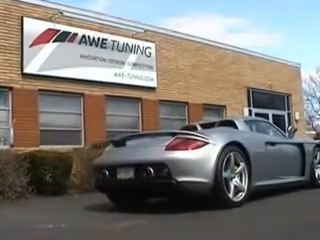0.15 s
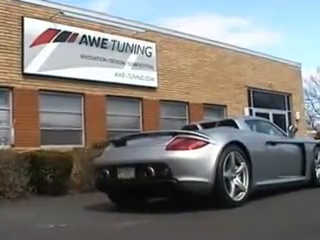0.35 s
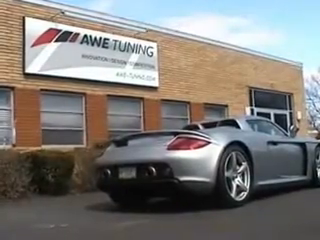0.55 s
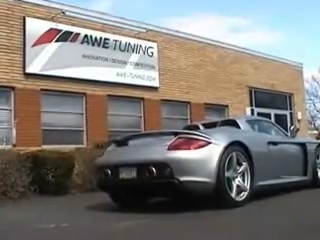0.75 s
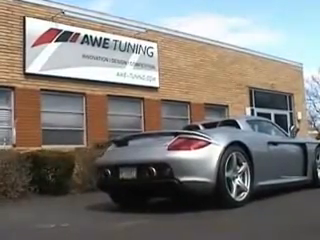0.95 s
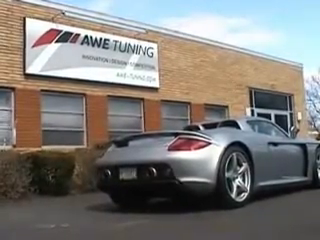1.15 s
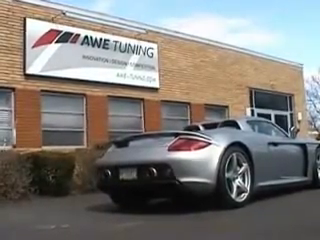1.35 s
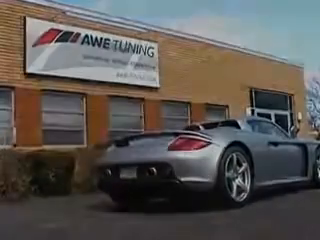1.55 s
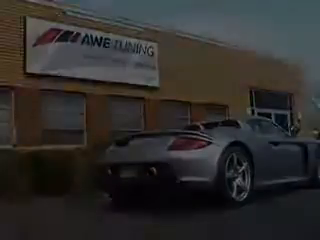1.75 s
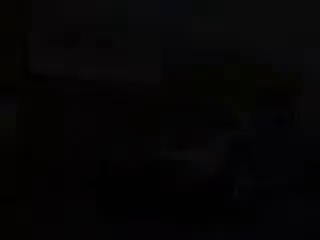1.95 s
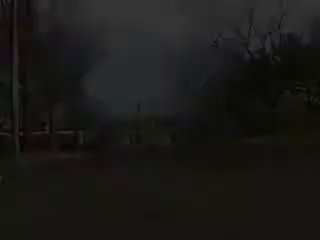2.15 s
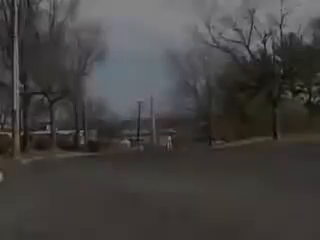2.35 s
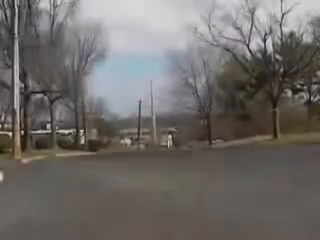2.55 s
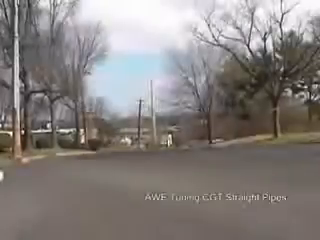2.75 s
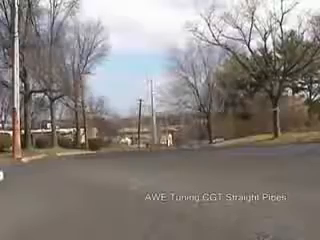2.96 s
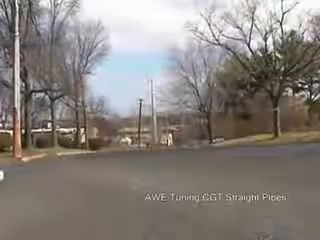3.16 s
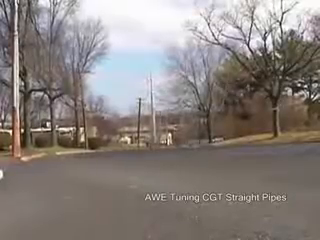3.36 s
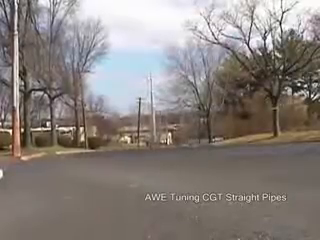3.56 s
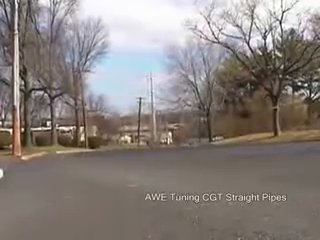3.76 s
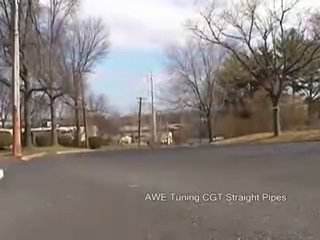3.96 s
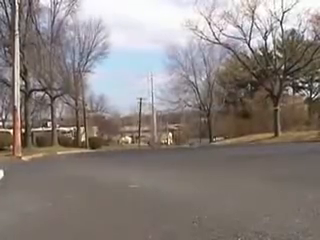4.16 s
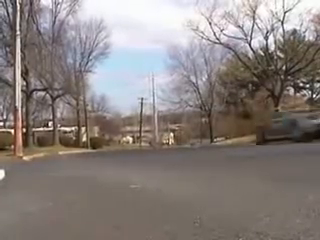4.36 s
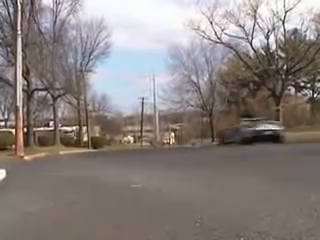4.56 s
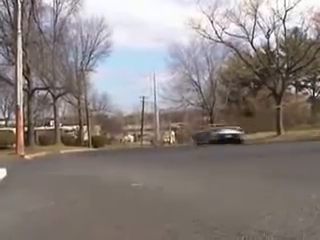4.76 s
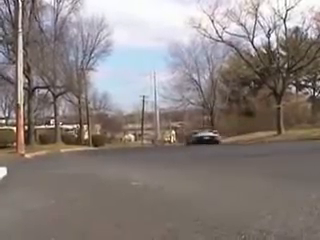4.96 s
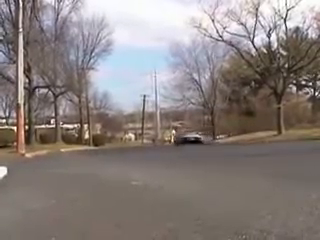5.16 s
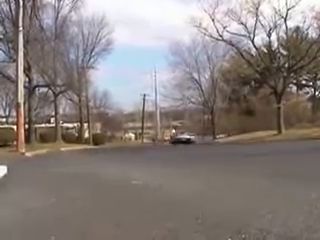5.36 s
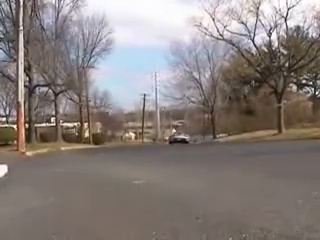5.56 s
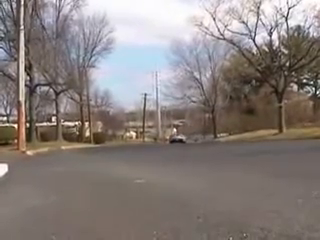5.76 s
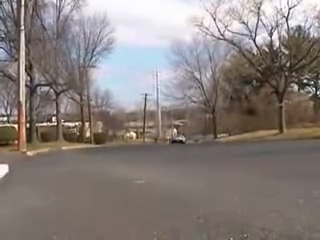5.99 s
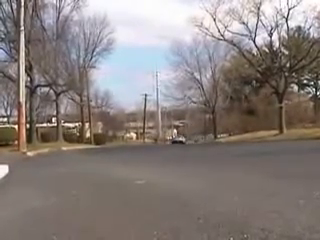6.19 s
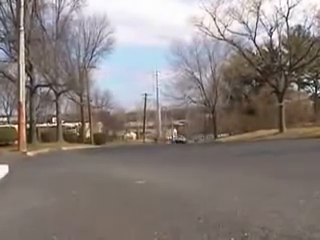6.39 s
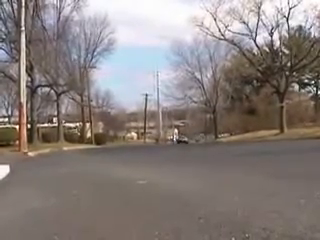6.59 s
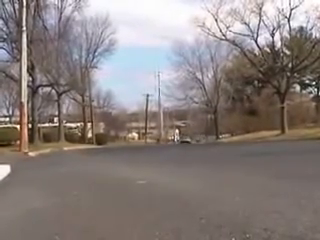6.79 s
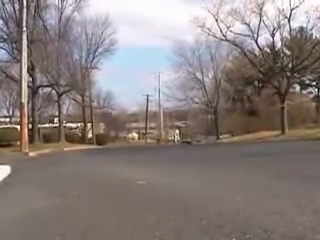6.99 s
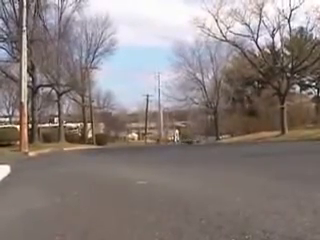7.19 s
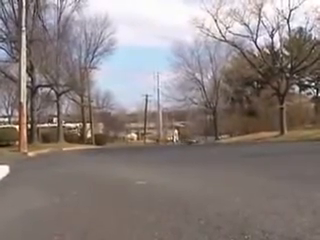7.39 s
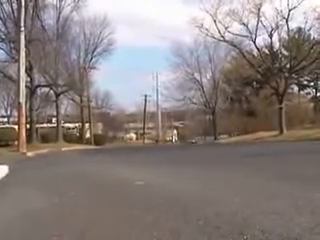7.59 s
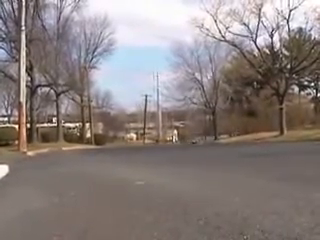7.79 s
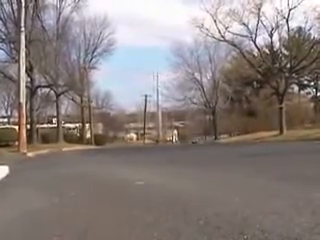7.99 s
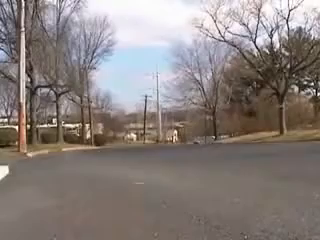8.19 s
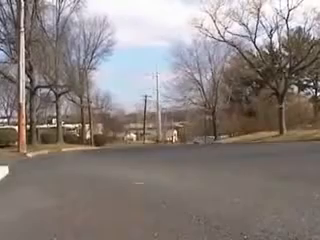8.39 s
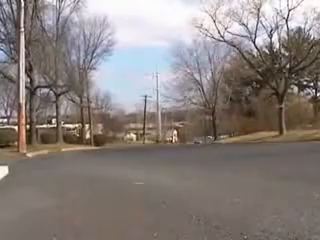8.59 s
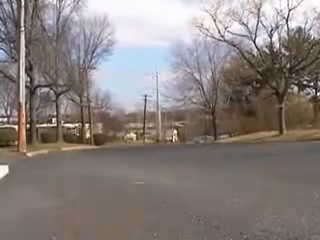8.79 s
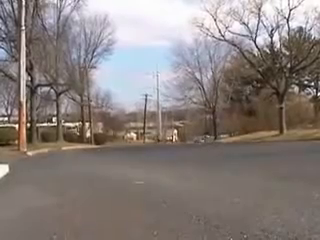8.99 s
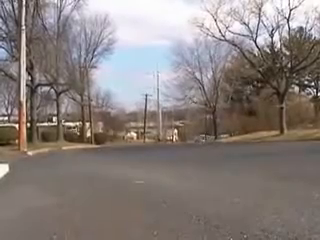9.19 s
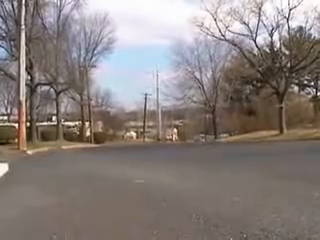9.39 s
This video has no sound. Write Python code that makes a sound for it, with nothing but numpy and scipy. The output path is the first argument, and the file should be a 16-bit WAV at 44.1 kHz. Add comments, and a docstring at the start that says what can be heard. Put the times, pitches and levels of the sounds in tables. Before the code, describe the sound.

Deep engine burble settles and fades to silence, then a howling full-throttle pass overloads the microphone, pops on a gear change and recedes.

```python
"""Beside a brick wall a ten-cylinder sports car with straight pipes drops from a blip to idle and fades out.
At a roadside, faded in next, it pulls past at full throttle, overloading the microphone, lifts off with
crackles for a gear change, pulls again far away, lifts again and cruises on.
Exhaust is summed from phase-locked orders, filtered firing pulses and noise puffs; pops are decaying modes
and noise cracks; tyres and rumble are coloured noise. Decaying-noise echoes and moving nulls place the car."""
import sys
import numpy as np
from scipy import signal
from scipy.fft import rfft, irfft
from scipy.io import wavfile
from scipy.ndimage import uniform_filter1d, map_coordinates

SR = 44100
rng = np.random.default_rng(int(sys.argv[2]) if len(sys.argv) > 2 else 0)


def to_wav(s):
    """Save 16-bit WAV."""
    ch = np.atleast_2d(s).T  # columns
    pcm = np.round(np.clip(ch, -1, 1) * 32767)  # PCM
    wavfile.write(sys.argv[1], SR, pcm.astype(np.int16))


N = 416304  # samples

# Source levels below are relative, ahead of echo and microphone. An order is a multiple of one bank's
# firing rate. A half-length is the time from a swell's peak to 1/e.

# Parked: falling firing rate of one bank: (time [s], rate [Hz])
COAST = [(0, 111.6), (.1, 92.25), (.17, 80), (.25, 71.2), (.33, 61.16), (.5, 50.2), (.58, 44.4), (.7, 42.6),
         (.82, 38.84), (1.15, 35.7), (2.05, 36.65)]
# Resonances of the parked car's pipe: (frequency [Hz], gain [dB])
IDLE_PIPE = [(30, -20), (70, -3.5), (110, -4.5), (150, 11.5), (210, -4), (280, -4), (380, -12.5),
             (520, -10.5), (620, -12), (720, -28.5), (950, -22.5), (1200, -39.5), (1900, -50),
             (2900, -47.5), (4500, -58.5)]
# Spectrum of the idle clatter: (frequency [Hz], gain [dB])
CLATTER_SPECTRUM = [(500, 5), (900, 7), (1400, -1), (2000, -3.5), (2500, -9.5), (3100, -9.5), (3700, -11),
                    (5500, -11), (7400, -9.5), (10000, -25)]
# Spectrum of the idle rasp: (frequency [Hz], gain [dB])
IDLE_RASP = [(1200, -22), (2400, 2), (3300, -1.5), (4200, -12.5), (8000, -22)]
# Spectrum of low rumble, parked and on the road: (frequency [Hz], gain [dB])
RUMBLE_SPECTRUM = [(15, -3.5), (40, -0.5), (90, -2), (170, -2), (300, -3.5), (700, -31.5), (2000, -67.5)]
# Parked layers, by name: (level at idle [dB], rise with revs [dB/octave], highest level [dB])
IDLE_LAYERS = {"exhaust": (-46, 9.3, -34), "clatter": (-64, 9.1, -50), "rasp": (-76, 13.4, -51),
               "rumble": (-53, 7.6, -40)}
# Boom as the falling rate sweeps the pipes: (order, level [dB])
BLIP_BOOM = [(1, -14), (2, 0), (3, -5), (5, -12)]
# Unburnt fuel pops in the pipes: (time [s], crack level [dB], thump relative to crack [dB])
POPS = [(0.216, -50, 19), (0.267, -45, 14.5), (0.3313, -53.5, 20.5), (7.238, -34.5, 18.5),
        (7.2558, -23, 12), (7.2718, -18, 1), (7.3158, -23, -2), (7.3336, -23.5, -2.5), (7.377, -33.5, 7),
        (7.476, -37.5, 13), (8.526, -41, 10.5), (8.5674, -40, 14), (8.594, -35.5, 15.5),
        (8.6051, -32.5, 12.5)]
# Ringing modes of a pop, before random detuning: (frequency [Hz], level [dB], decay by 60 dB [s])
POP_MODES = [(300, 3, 0.061), (350, 9, 0.052), (560, -9, 0.016)]
# Spectrum of the gargle in the pipes: (frequency [Hz], gain [dB])
BURBLE_SPECTRUM = [(250, -32), (460, 10), (600, 0), (800, -21), (3000, -48)]
# Spectrum of the background hiss: (frequency [Hz], gain [dB])
FLOOR_SPECTRUM = [(100, 6.5), (600, 0.5), (2000, -10), (8000, -16), (10000, -21.5)]

# On the road: firing rate of one bank, before driveline swings: (time [s], rate [Hz])
SPEED = [(2.1, 148.1), (2.95, 175.4), (3.35, 196.3), (3.53, 199.8), (3.7, 206.4), (3.87, 209.3),
         (4.27, 206.9), (4.75, 214.5), (5.3, 227.9), (5.9, 250.2), (7.24, 319.2), (7.5, 227.6),
         (7.72, 168.5), (7.76, 209), (7.795, 258.8), (7.845, 244.8), (7.92, 233.5), (8.3, 239.1),
         (8.65, 238.8), (9.44, 224.4)]
# Jolts that set the driveline swinging: (time [s], swing of the firing rate [Hz])
JOLTS = [(5.489, 5), (7.905, -12.5), (8.351, -10.5)]
# Throttle openings: (open from [s], open until [s], load [0-1], closing time [s])
THROTTLE = [(2.0, 3.26, .45, .035), (3.26, 7.228, 1, .03), (7.31, 7.5, .33, .22), (7.75, 8.42, 1, .06),
            (8.622, 9.5, .63, .05)]
# Exhaust reaching the roadside; it leaps as the pipes come into view: (time [s], exposure [dB])
EXPOSURE = [(2.2, -29), (2.8, -22.5), (3.1, -22.5), (3.32, -23), (3.84, -21), (3.91, -10), (4.03, -7),
            (4.42, -1), (4.9, -9), (5.3, -14), (5.85, -16.5), (6.55, -14), (7.2, -19), (7.7, -21.5),
            (8.42, -17.5), (8.8, -25.5), (9.44, -28)]
# Road layers, by name: (level [dB], share of exposure, rise with revs [dB/octave],
# drop off the throttle [dB], loss behind the car's body, negative for a gain [dB])
ROAD_LAYERS = {"boom": (-17, 0.2954, 3, 1, -3.5), "howl": (-17.1, .05, 0, 19, 8),
               "third": (-16, 1.14, -1.5, 8.5, 6.5), "fourth": (-13.5, 1.78, 1.5, 16, -4),
               "lope": (-29, 0.44, 10, -5, -1), "blare": (-18.5, 1, 7.5, 6, 3.5),
               "rasp": (-24, 1.4354, 21.5, 1.5, -0.5)}
# Low road and air rumble: (time [s], level [dB])
RUMBLE_LEVEL = [(2.5, -47), (4.1, -32), (5.24, -36.5), (6.11, -34.5), (9.44, -45)]
# Tyre and intake hiss: (time [s], level [dB])
HISS_LEVEL = [(2.2, -67.5), (2.8, -57), (3.1, -68), (3.32, -53.5), (3.8, -55), (4.2, -39), (4.6, -42.5),
              (5.2, -76.5), (9.44, -82.5)]
# Spectrum of that hiss: (frequency [Hz], gain [dB])
TYRE_SPECTRUM = [(2000, -21), (5000, -4.5), (6500, -2), (7700, -1.5), (9000, -7), (10300, -21.5)]
# Pipe resonances met by passing orders: (frequency [Hz], gain [dB])
PIPE = [(150, -8), (177, -3), (207, -1.5), (228, -6), (255, -13), (295, -15), (320, -10), (350, -20),
        (395, -13), (418, -9), (445, -5.5), (466, -1), (560, 1), (650, 1), (695, 3), (730, 1), (780, -13),
        (850, -12), (905, -17), (950, -6), (1040, -12), (1120, -18), (1300, -25)]
# Brief dips of the boom as the car gathers way: (time [s], depth [dB])
DIPS = [(2.38, 18), (2.63, 7), (2.79, 23), (2.935, 9), (3.125, 10), (3.285, 10)]
# Momentary flares of low orders, negative when sinking: (time [s], half-length [s], order, rise [dB])
FLARES = [(2.2, .2, 1, -4), (2.42, .25, 3, 8), (4.15, .35, 2, 3), (6.05, .25, 4, 7), (6.95, .25, 1, 4),
          (7.68, .14, 1, -13), (7.79, .04, 4, 17), (8.15, .3, 2, 2), (8.22, .3, 4, 17), (9.2, .4, 1, 2),
          (9.25, .4, 2, 3.5)]
# Spectrum of the brassy firing pulses: (frequency [Hz], gain [dB])
BLARE_SPECTRUM = [(550, -44.5), (720, 0.5), (850, 5), (1080, 5.5), (1270, 3), (1480, -2), (1700, -2.5),
                  (2100, -3), (2600, -17), (4000, -30.5), (8000, -63)]
# Spectrum of the gas noise beneath them: (frequency [Hz], gain [dB])
ROAR_SPECTRUM = [(200, -13), (500, 0.5), (850, -1), (1300, -2.5), (1800, -4.5), (2300, -13), (3200, -18.5),
                 (6000, -57.5)]
# Spectrum of the rasp: (frequency [Hz], gain [dB])
RASP_SPECTRUM = [(1400, -32.5), (2100, 6.5), (2700, 2.5), (3700, 1), (5000, -4.5), (7200, -12), (8500, -17),
                 (10000, -26)]
# Colour from far down the road: (frequency [Hz], gain [dB])
AIR = [(900, 1.5), (1180, -1.5), (1750, -3), (3500, -5.5), (5000, -8.5), (8000, -14)]
# Spectrum of unequal cylinders and gas noise: (frequency [Hz], gain [dB])
LOPE_SPECTRUM = [(60, -20.5), (170, -11), (270, 1), (330, -0.5), (420, 0), (540, -3), (700, -3.5),
                 (900, -10), (1600, -23.5), (3000, -67)]
# Short exhaust barks around throttle changes: (time [s], half-length [s], level [dB])
BARKS = [(3.167, .025, -40), (3.287, 0.024, -34.5), (7.794, 0.037, -42), (8.414, .03, -42.5)]
# Spectrum of a bark: (frequency [Hz], gain [dB])
BARK_SPECTRUM = [(350, -22), (650, 6), (1050, 5), (1400, -6), (2000, -14), (3500, -25), (9000, -54)]
# Growl under load: (order, level [dB])
GROWL_ORDERS = [(4, -1), (5, -5), (6, -1), (7, -5.5), (8, -5.5), (9, -7.5), (10, -13)]
# Its swells after the throttle opens: (time [s], half-length [s], level [dB])
GROWLS = [(3.48, .22, -49), (7.8, .04, -44)]
# Reflection off the verge: (time [s], delay [ms], strength [ratio])
VERGE = [(4.15, .3, 0), (4.33, .4, .6), (4.46, .51, .7), (4.6, .6, .55), (4.8, .73, .3), (5.0, .85, 0)]
# High orders sing out far behind the car: (order, level [dB])
SONG_ORDERS = [(3.2, -9), (5, -6), (5.2, -6), (6, 1.5), (7, -14), (8, -5), (9, -16), (11, -20)]
# Pipes drone during the gear change: (order, level [dB])
OVERRUN_ORDERS = [(1, -10), (1.6, -4), (2, 0), (2.6, -14)]

IDLE_HZ, MID_REVS_HZ = 36.4, 230  # reference firing rates of one bank
IDLE_ROUGH, IDLE_ODD_DB = .5, -9  # share of rough gas; change of odd orders at idle
BLIP_BOOM_S, BLIP_BOOM_HALF_S, BLIP_BOOM_DB = .1, .12, -35
FLOOR_DB = -77.5
CUT_S, GAP_S, FADE_FLOOR = 2.11, 0.031, 0.14  # change of place; ramp to silence on each side; least fade gain
FADE_OUT_S, FADE_IN_S, FADE_OUT_SHAPE, FADE_IN_SHAPE = 0.86, 0.78, 0.6, 1  # lengths and exponents
OPEN_S = 0.022  # throttle opening time
SHUDDER_HZ, SHUDDER_S = 7.39, 0.18  # rate and 1/e decay time of the driveline swing
SCREEN_S, SCREEN_HALF_S = 3.33, 0.44  # the approaching car's body stands between pipes and microphone
PASS_S, APPROACH_S, RECEDE_S = 4.37, 18, 5.3  # the pass; time to full remoteness ahead and behind
# share of the blare that is clean pulses: value at 0 dB exposure, change per dB, loss far away
CLEAN_NEAR, CLEAN_PER_DB, CLEAN_FAR_LOSS = .89, .018, .8
DIP_HALF_S = 0.015
BOOM_FAR_LOSS_DB, BOOM_FLUTTER = 10.5, 2.4  # far away the boom is weaker and flutters
BUMP_S, BUMP_HZ, BUMP_HALF_S, BUMP_DB = 3.195, 54.8, 0.0092, -27.5
# a reflection cancels a band that sinks as the car passes; width in natural-log frequency
NULL_HZ, NULL_SINK_S, NULL_WIDTH, NULL_DB = 645, 0.67, 0.13, 17
HOLLOW_HZ, HOLLOW_SINK_S, HOLLOW_DB = 1646, 0.54, 7.5  # a higher null
NEAR_HALF_S, NEAR_ECHO_LOSS, NEAR_DIRECT_GAIN = 0.41, 0.6, 0.32  # direct sound outweighs echo at the pass
SONG_S, SONG_HALF_S, SONG_DB = 6.48, .7, -40
OVERRUN_S, OVERRUN_HALF_S, OVERRUN_DB = 7.45, .24, -31
TOP_HZ = 10300  # band limit


def amp(db):
    """The decibel relation: amplitude ratio of a level."""
    return 10 ** (np.asarray(db) / 20)


def unit(x):
    """Normalisation of mean power: x at rms 1."""
    return x / np.sqrt(np.mean(x ** 2) + 1e-20)


def steady(x):
    """Short-time power normalisation: x held at rms 1 over a moving 91 ms window."""
    power = np.abs(uniform_filter1d(x ** 2, size=4000))
    return x / np.sqrt(power + 1e-12)


def curves(rows):
    """Linear interpolation: one value per sample for each column after the time."""
    s, *cols = np.transpose(rows)
    return [np.interp(np.arange(N) / SR, s, c) for c in cols]


def wobble(rate):
    """Band-limited fluctuation: a smooth random curve with rate knots a second."""
    knots = rng.standard_normal(int(N * rate / SR) + 4)
    coarse = np.arange(0, N, 32)
    return np.interp(np.arange(N), coarse, map_coordinates(knots, [coarse * rate / SR]))


def swell(at_s, half_s):
    """Gaussian envelope: a bell-shaped rise and fall, 0-1."""
    return np.exp(-((np.arange(N) / SR - at_s) / half_s) ** 2)


def colour(x, points):
    """Minimum-phase filtering: a causal response with the gain of (frequency [Hz], gain [dB]) points."""
    m = 8192
    hz, db = np.transpose(points)
    gain = amp(np.interp(np.log(np.fft.rfftfreq(m, 1 / SR) + 1), np.log(hz), db))
    # folding the cepstrum onto positive time makes the response causal
    cepstrum = irfft(np.log(gain), m)
    cepstrum[1:m // 2] *= 2
    cepstrum[m // 2 + 1:] = 0
    response = irfft(np.exp(rfft(cepstrum)), m)[:m // 2]
    return signal.oaconvolve(x, response)[:N]


def noise(points):
    """Spectral shaping of white noise: coloured noise of rms 1."""
    return unit(colour(rng.standard_normal(N), points))


def orders(turns, rows, flutter_db, rate):
    """Harmonic synthesis: lines at multiples of the firing rate, each wavering in level on its own."""
    lines = [amp(db + flutter_db * wobble(rate)) * np.cos(2 * np.pi * order * turns + order ** 2)
             for order, db in rows]
    return np.sqrt(2) * sum(lines)


def firings(turns, pattern, scatter):
    """Periodic excitation: a pulse each whole turn, sized by a repeating cylinder pattern and by chance."""
    count = np.arange(1, int(turns[-1]))
    at = np.interp(count, turns, np.arange(N))
    size = np.asarray(pattern)[count % len(pattern)] + scatter * rng.standard_normal(len(count))
    # a windowed sinc places each pulse between samples
    taps = at.astype(int)[:, None] + np.arange(-7, 9)
    lag = taps - at[:, None]
    shape = np.sinc(lag) * np.cos(np.pi * lag / 16) ** 2
    return np.bincount(np.clip(taps, 0, N - 1).ravel(), (size[:, None] * shape).ravel(), N)


def puffs(turns, depth):
    """Amplitude modulation: white noise swells once a turn, as gas leaves the pipe."""
    return rng.standard_normal(N) * np.exp(depth * np.cos(2 * np.pi * turns))


def ring(x, delay_ms, share):
    """All-pass recirculation: pulses bounce in the pipe, spread in time with their colour unchanged."""
    loop = np.r_[1, np.zeros(int(delay_ms * SR / 1000)), np.clip(share, 0, .8)]
    return signal.lfilter(loop[::-1], loop, x)


def idle_exhaust(bank_turns, bank_hz, octaves):
    """Resonant emphasis: orders slide through the pipe's resonances, roughened by unequal firings and gas."""
    pipe_hz, pipe_db = np.transpose(IDLE_PIPE)
    # the odd orders fade as the banks even out at idle
    odd_db = IDLE_ODD_DB * np.clip(1 - octaves, 0, 1)
    stack = [(k, np.interp(k * bank_hz, pipe_hz, pipe_db) + k % 2 * odd_db) for k in range(1, 18)]
    turns = 2 * bank_turns
    uneven = firings(turns, [.5, -.1, .2, .1, -.3, -.1, -.3, .2, .3, -.3], scatter=0.25)
    gas = unit(ring(uneven, delay_ms=5.9, share=.5)) + unit(puffs(turns, depth=0.29))
    clear = steady(orders(bank_turns, stack, flutter_db=1.5, rate=13.5))
    return clear + IDLE_ROUGH * steady(colour(gas, IDLE_PIPE))


def blip_boom(bank_turns):
    """Passage through resonance: low orders boom briefly as the falling rate sweeps the pipes."""
    envelope = amp(BLIP_BOOM_DB) * swell(BLIP_BOOM_S, BLIP_BOOM_HALF_S)
    return envelope * orders(bank_turns, BLIP_BOOM, flutter_db=3, rate=18)


def parked():
    """Source superposition: both banks fire in turn, with boom and rasp while the revs are high."""
    bank_hz, = curves(COAST)
    octaves = np.log2(bank_hz / IDLE_HZ)
    gain = {name: amp(np.minimum(db + rise * octaves, top_db))
            for name, (db, rise, top_db) in IDLE_LAYERS.items()}
    bank_turns = np.cumsum(bank_hz * (1 + .008 * wobble(14))) / SR
    turns = 2 * bank_turns
    layers = {"exhaust": idle_exhaust(bank_turns, bank_hz, octaves),
              "clatter": unit(colour(puffs(turns, depth=0.22), CLATTER_SPECTRUM)),
              "rasp": unit(colour(puffs(turns, depth=0.4), IDLE_RASP)),
              "rumble": noise(RUMBLE_SPECTRUM)}
    gargle = burble(turns, at_s=0.23, half_s=0.057, level_db=-36.5)
    return sum(gain[name] * layers[name] for name in layers) + blip_boom(bank_turns) + gargle


def echo(x, t60):
    """Diffuse reverberation: convolution with decaying noise of unit energy."""
    t = np.arange(SR // 2) / SR
    tail = rng.standard_normal(len(t)) * amp(-60 * t / t60)
    return signal.fftconvolve(x, tail / np.linalg.norm(tail))[:N]


def surroundings(x, t60, wet_db, near=0):
    """Direct-to-reverberant ratio: a short scattered echo counts for less while the car is near."""
    scattered = colour(echo(x * (1 - NEAR_ECHO_LOSS * near), t60),
                       [(60, -9.5), (200, 0), (600, 3.0), (1200, 4), (3000, 3), (9000, -0.5)])
    return x * (1 + NEAR_DIRECT_GAIN * near) + amp(wet_db) * scattered


def background_hiss():
    """Stationary noise: a steady faint hiss."""
    return amp(FLOOR_DB) * noise(FLOOR_SPECTRUM)


def backfires():
    """Impulsive excitation: each pop is a sharp noise crack and a short modal ring of the pipe."""
    t = np.arange(SR // 10) / SR
    cracks, thumps = np.zeros(N), np.zeros(N)
    for s, db, thump_db in POPS:
        start = round(s * SR)
        thump = sum(amp(level - 60 * t / t60) * np.sin(2 * np.pi * hz * rng.uniform(1.0, 1.1) * t)
                    for hz, level, t60 in POP_MODES)
        thumps[start:start + len(t)] += amp(db + thump_db - 8.5) * thump
        cracks[start:start + len(t)] += amp(db - 60 * t / 0.028) * rng.standard_normal(len(t))
    return thumps + colour(cracks, [(300, -2.5), (1500, 8.5), (4000, -3.0), (10000, -29.0)])


def burble(turns, at_s, half_s, level_db):
    """Modulated combustion noise: late-burning fuel gargles briefly in the pipes."""
    return amp(level_db) * swell(at_s, half_s) * unit(colour(puffs(turns, depth=0.72), BURBLE_SPECTRUM))


def fade(away_s, length_s, shape):
    """Power-law fading: gain grows with the time away from the change of place."""
    gap = np.clip(away_s / GAP_S, 0, 1)
    return gap * np.maximum(np.clip(away_s / length_s, 0, 1) ** shape, FADE_FLOOR)


def throttle(t):
    """Piecewise-linear control: engine load 0-1 as the throttle opens, holds and closes."""
    total = 0
    for on, off, load, close_s in THROTTLE:
        opening = (t - on) / OPEN_S
        closing = 1 - (t - off) / close_s
        total = total + load * np.clip(np.minimum(opening, closing), 0, 1)
    return np.clip(total, 0, 1)


def shudder(t):
    """Damped oscillation: after each jolt the revs swing about their course and settle."""
    total = 0
    for s, swing in JOLTS:
        since = np.maximum(t - s, 0)
        total = total + swing * np.exp(-since / SHUDDER_S) * np.sin(2 * np.pi * SHUDDER_HZ * since)
    return total


def null(hz, t, null_hz, sink_s):
    """Destructive interference: depth 0-1 of a cancelled band that sinks as the car passes."""
    since = t - PASS_S
    off_null = np.log(hz / null_hz) + since / sink_s
    return np.exp(-(off_null / NULL_WIDTH) ** 2 - (since / sink_s) ** 2)


def tone_db(hz):
    """Transfer function: pipe gain at an order's momentary frequency, less the sinking null."""
    pipe_hz, pipe_db = np.transpose(PIPE)
    resonance_db = np.interp(np.log(hz), np.log(pipe_hz), pipe_db)
    return resonance_db - NULL_DB * null(hz, np.arange(N) / SR, NULL_HZ, NULL_SINK_S)


def low_order(order, db, turns, bank_hz):
    """Harmonic radiation: one order with fixed phase, pipe gain, flares and a random waver."""
    flare_db = sum(rise * swell(s, half_s) for s, half_s, k, rise in FLARES if k == order)
    level_db = db + flare_db + tone_db(order * bank_hz) + 0.93 * wobble(22)
    return np.sqrt(2) * amp(level_db) * np.cos(2 * np.pi * order * turns + 1.347 * order ** 2)


def low_orders(turns, bank_hz, level, load, far):
    """Harmonic superposition: boom of one bank, howl of both, and the third and fourth orders."""
    dips_db = sum(db * swell(s, DIP_HALF_S) for s, db in DIPS)
    boom_db = level["boom"] - dips_db - BOOM_FAR_LOSS_DB * far
    flutter = np.clip(BOOM_FLUTTER * far, 0, .9) * np.tanh(wobble(28))
    levels = [boom_db, level["howl"], level["third"], level["fourth"]]
    boom, howl, third, fourth = [low_order(order, db, turns, bank_hz) for order, db in enumerate(levels, 1)]
    # off the throttle the cylinders burn unevenly: the howl throbs over each five-cylinder cycle
    cycle = 2 * np.pi * turns / 5
    depth = np.minimum(.12 + 1.2 * (1 - load), .8)
    throb = depth * (.5 * np.cos(cycle) + .4 * np.sin(2 * cycle))
    return boom * (1 + flutter) + howl * (1 + throb) + third + fourth


def upper_orders(turns, blare_db, rasp_db, clean, far):
    """Broadband pulse excitation: sharp firings and puffs of gas make the brassy blare and the rasp."""
    near_bank = firings(turns, [1, 1.08, .9, 1.05, .95], scatter=.08)
    # the second bank fires halfway between; far away both are heard and even orders lead
    pulses = near_bank + 0.76 * far * firings(turns + .5, [1], scatter=0.083)
    brass = steady(colour(ring(pulses, delay_ms=1.302, share=0.5), BLARE_SPECTRUM))
    blare = np.sqrt(clean) * brass * amp(1.5 + 1.8 * wobble(19) + 1.4 * wobble(90))
    roar = np.sqrt(1 - clean) * unit(colour(puffs(turns, depth=0.16), ROAR_SPECTRUM)) * amp(1.0)
    # close by, each firing stands out as a separate snap; distance smears them into hiss
    crisp = .8 * clean ** 2
    snaps = steady(colour(ring(pulses, delay_ms=.45, share=0.12), RASP_SPECTRUM))
    gas = steady(colour(puffs(turns, depth=.2 + .7 * crisp), RASP_SPECTRUM))
    rasp = np.sqrt(crisp) * snaps + np.sqrt(1 - crisp) * gas
    bright = amp(blare_db) * (blare + roar) + amp(rasp_db + 1.56 + 3.9 * far) * rasp
    return (1 - far) * bright + far * colour(bright, AIR)


def uneven_lope(turns):
    """Subharmonic sidelines: five unequal cylinders give lines at fifths of the firing rate, over gas noise."""
    uneven = firings(turns, [0.85, 0.27, -0.053, -0.48, 0.09], scatter=0.5)
    sidelines = steady(colour(uneven, LOPE_SPECTRUM))
    return .7 * (sidelines + noise(LOPE_SPECTRUM)) * (1 - .5 * swell(PASS_S, .6))


def road_rumble():
    """Low-frequency turbulence: rumble of road and air."""
    return amp(curves(RUMBLE_LEVEL)[0]) * noise(RUMBLE_SPECTRUM)


def driving():
    """Source and path: exposure, revs and load set the exhaust layers, tied to the shaft."""
    t = np.arange(N) / SR
    bank_hz = curves(SPEED)[0] + shudder(t)
    exposure_db, = curves(EXPOSURE)
    load, octaves = throttle(t), np.log2(bank_hz / MID_REVS_HZ)
    screened = swell(SCREEN_S, SCREEN_HALF_S)
    level = {name: db + share * exposure_db + rise * octaves - drop * (1 - load) - loss * screened
             for name, (db, share, rise, drop, loss) in ROAD_LAYERS.items()}
    far = np.clip(np.maximum((PASS_S - t) / APPROACH_S, (t - PASS_S) / RECEDE_S), 0, 1)
    exposed_clean = CLEAN_NEAR + CLEAN_PER_DB * exposure_db
    clean = np.clip(exposed_clean * (1 - CLEAN_FAR_LOSS * far) * (1 + load) / 2, 0, 1)
    turns = np.cumsum(bank_hz * (1 + 0.002513 * wobble(25) + 0.00199 * wobble(130))) / SR
    upper = passing(hollowed(upper_orders(turns, level["blare"], level["rasp"], clean, far)))
    roar = upper + amp(level["lope"]) * uneven_lope(turns) + road_rumble() + barks(turns)
    tones = low_orders(turns, bank_hz, level, load, far) + song(turns) + growl(turns, load) + overrun(turns)
    return tones, roar


def tyres():
    """Friction and flow noise: a high hiss ahead of the approaching car sinks to a faint floor behind it."""
    return amp(curves(HISS_LEVEL)[0]) * noise(TYRE_SPECTRUM)


def barks(turns):
    """Transient excitation: short bursts of hard, uneven firings and gas."""
    burst = unit(firings(turns, [1], scatter=0.26)) + 0.57 * unit(puffs(turns, depth=0.48))
    envelope = sum(amp(db) * swell(s, half_s) for s, half_s, db in BARKS)
    return envelope * steady(colour(burst, BARK_SPECTRUM))


def bump():
    """Pressure pulse: one soft, low puff of air on the microphone."""
    since = np.arange(N) / SR - BUMP_S
    return amp(BUMP_DB) * swell(BUMP_S, BUMP_HALF_S) * np.cos(2 * np.pi * BUMP_HZ * since)


def growl(turns, load):
    """Load-dependent harmonics: the middle orders growl while the engine takes up load."""
    level = sum(amp(db) * swell(s, half_s) for s, half_s, db in GROWLS)
    return level * load ** 3 * orders(turns, GROWL_ORDERS, flutter_db=2.5, rate=30)


def passing(x):
    """Comb filtering: the verge reflects the treble, and its growing delay sweeps the comb downward."""
    delay_ms, strength = curves(VERGE)
    treble = signal.sosfiltfilt(signal.butter(2, 1900, "high", fs=SR, output="sos"), x)
    return x + strength * map_coordinates(treble, [np.arange(N) - delay_ms * SR / 1000], order=1)


def hollowed(x):
    """Destructive interference: the reflection's higher null sweeps down through the blare."""
    hz, t, z = signal.stft(x, SR, nperseg=1024)
    gain = amp(-HOLLOW_DB * null(hz[:, None] + 1, t, HOLLOW_HZ, HOLLOW_SINK_S))
    return signal.istft(z * gain, SR, nperseg=1024)[1][:N]


def song(turns):
    """Harmonic prominence: a stack of high orders rides above the howl as the car draws away."""
    return amp(SONG_DB) * swell(SONG_S, SONG_HALF_S) * orders(turns, SONG_ORDERS, flutter_db=3.0, rate=35)


def overrun(turns):
    """Frequency tracking: the pipes drone unevenly as the revs fall for the gear change."""
    envelope = amp(OVERRUN_DB) * swell(OVERRUN_S, OVERRUN_HALF_S)
    return envelope * orders(turns, OVERRUN_ORDERS, flutter_db=2.5, rate=55)


def scene():
    """Superposition: the parked car fades out, the roadside fades in; clear orders get little echo."""
    t = np.arange(N) / SR
    tones, roar = driving()
    fade_out = fade(CUT_S - t, FADE_OUT_S, FADE_OUT_SHAPE)
    fade_in = fade(t - CUT_S, FADE_IN_S, FADE_IN_SHAPE)
    forecourt = surroundings(fade_out * parked(), t60=0.38, wet_db=-11.0)
    direct = surroundings(fade_in * tones, t60=0.28, wet_db=-20)
    near = swell(PASS_S, NEAR_HALF_S)
    road = surroundings(fade_in * (roar + tyres()), t60=0.47, wet_db=-6.5, near=near)
    pops = surroundings(backfires(), t60=.3, wet_db=-12)
    return (forecourt + direct + road + pops + bump() + background_hiss())[None]


def record(dry):
    """Soft saturation: the microphone overloads at high level; nothing is kept above the band limit."""
    ceiling, knee = .31, 5  # greatest amplitude; sharpness of the bend
    driven = amp(0.82) * dry
    clipped = driven / (1 + np.abs(driven / ceiling) ** knee) ** (1 / knee)
    return irfft(rfft(clipped) * (np.fft.rfftfreq(N, 1 / SR) < TOP_HZ), N)


dry = scene()
out = record(dry)
to_wav(out)
```